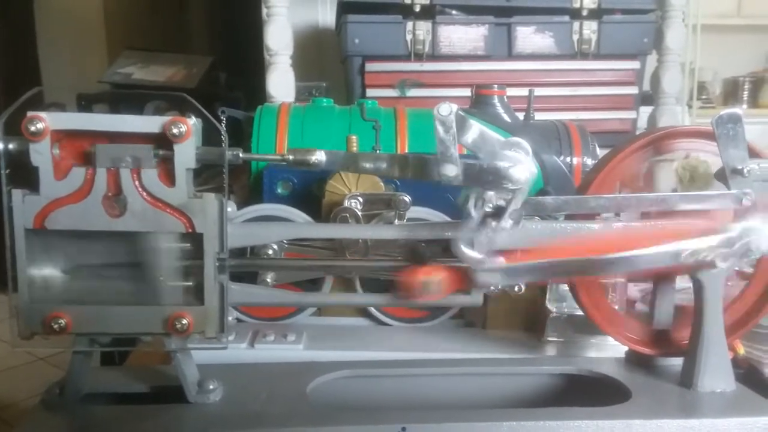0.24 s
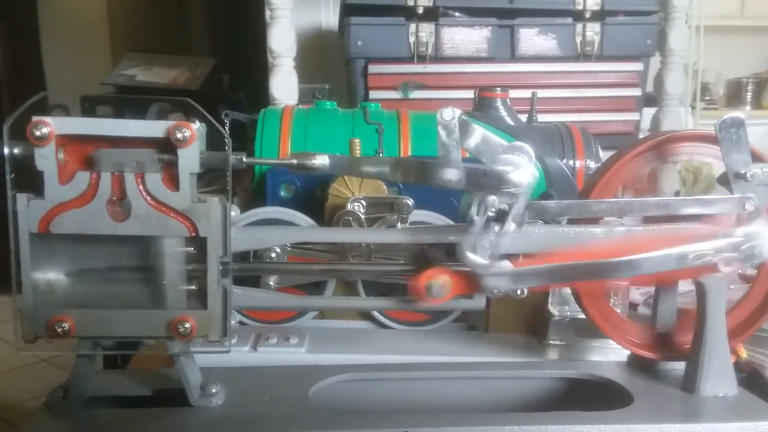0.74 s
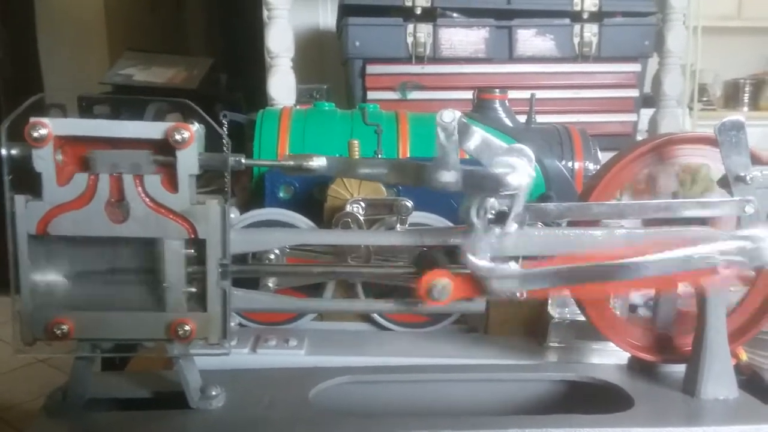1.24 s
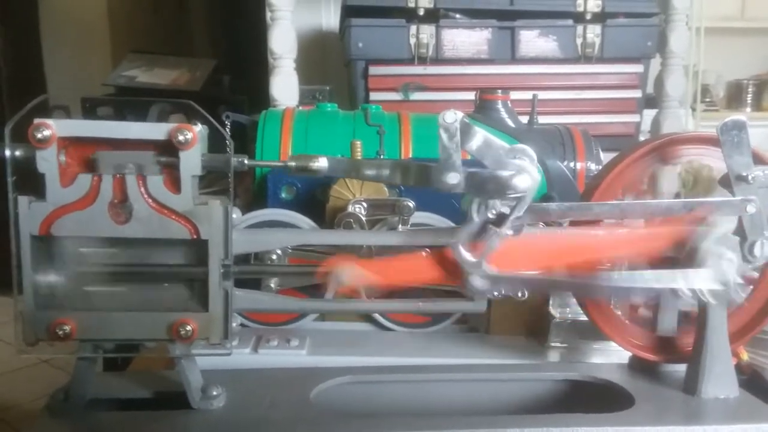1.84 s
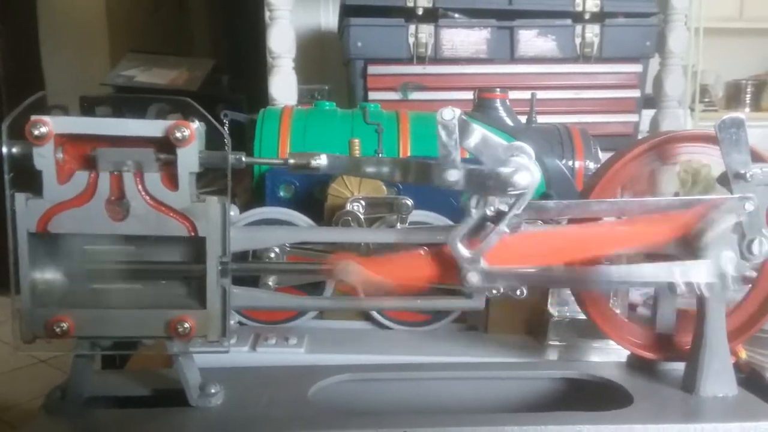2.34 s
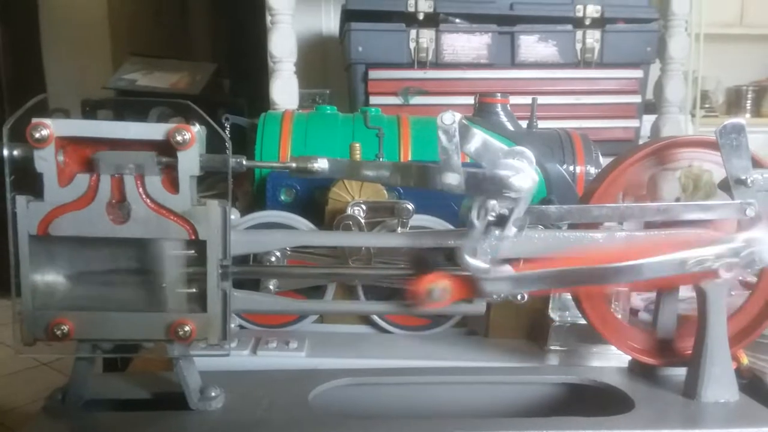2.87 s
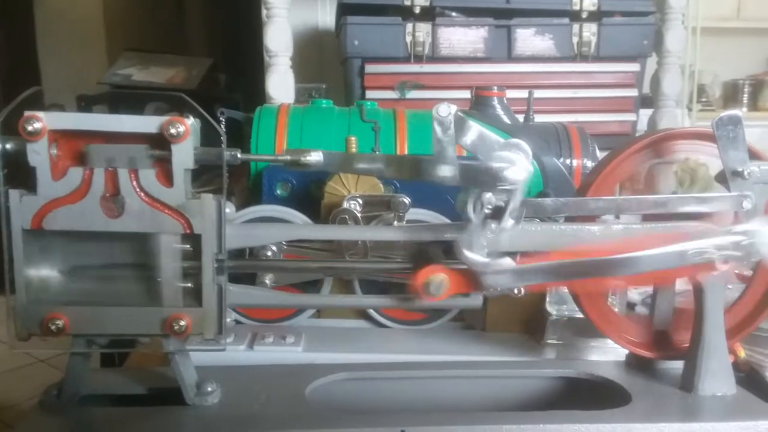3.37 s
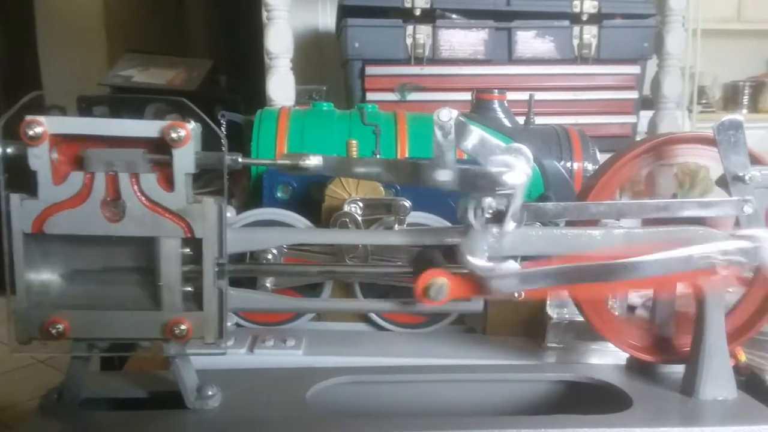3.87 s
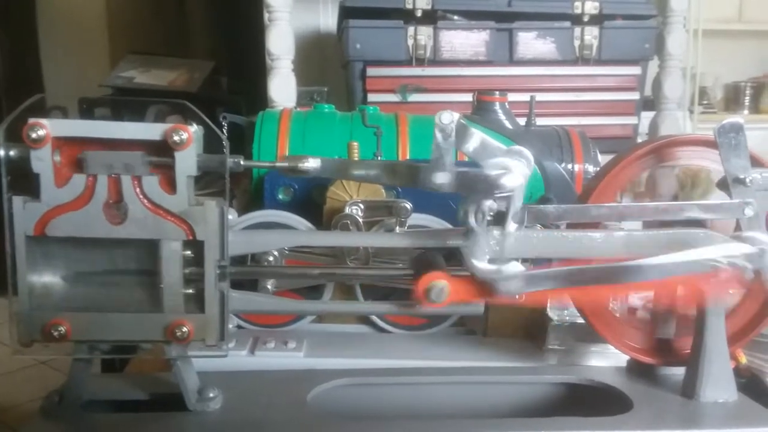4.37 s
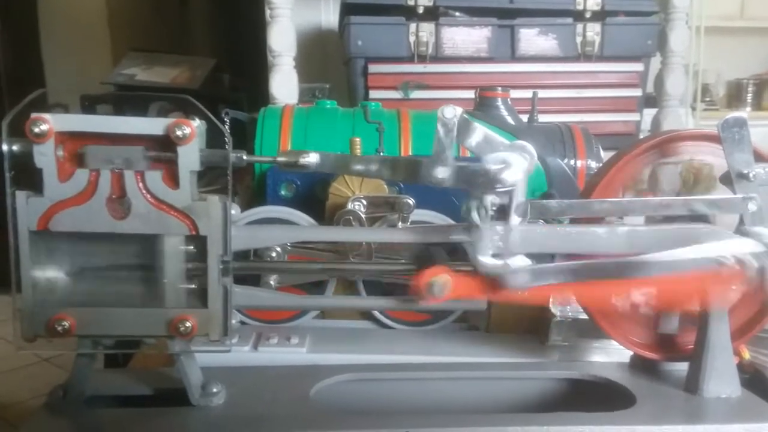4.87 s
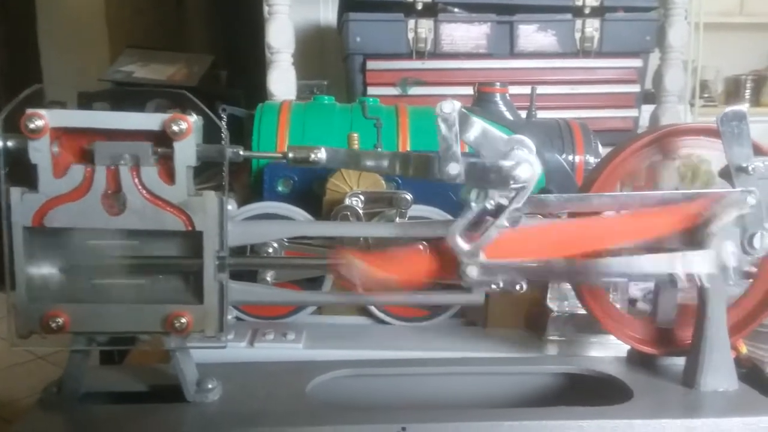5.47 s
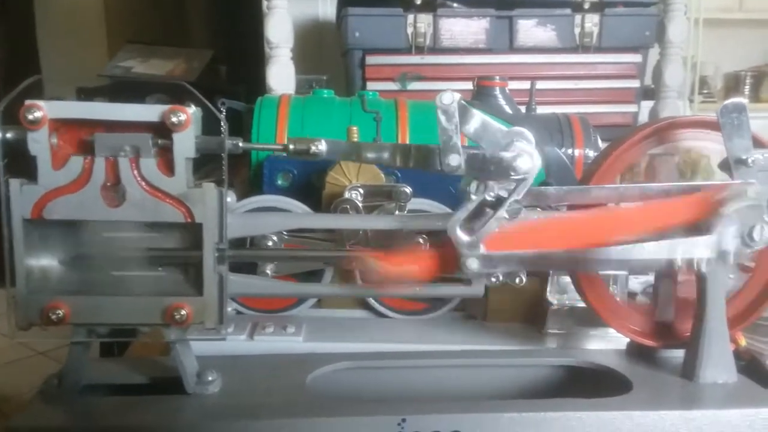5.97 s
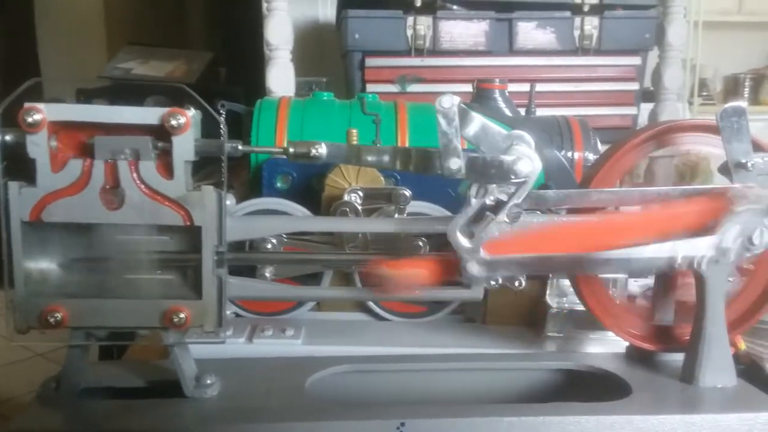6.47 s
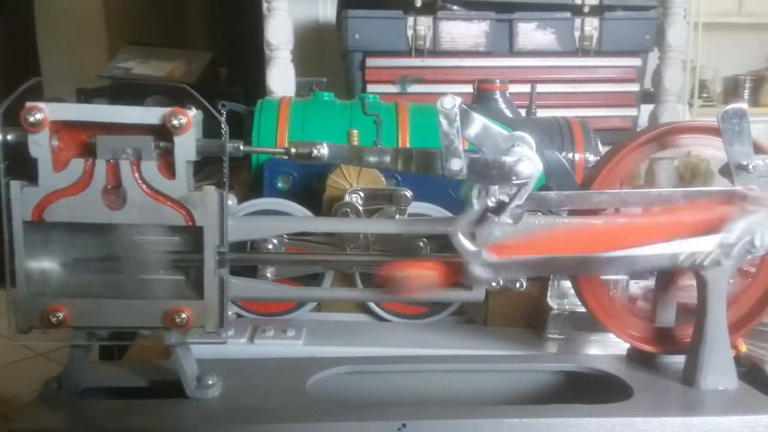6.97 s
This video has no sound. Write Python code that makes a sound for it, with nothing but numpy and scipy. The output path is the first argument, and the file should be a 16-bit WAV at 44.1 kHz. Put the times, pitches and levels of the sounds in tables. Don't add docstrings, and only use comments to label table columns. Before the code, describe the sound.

Loud, steady turbulent air from a blower spins a cutaway model engine on a bench. The roar is thick and nasal around the middle range, with little deep bass, a fine fluttering hiss, a fast buzz-like throb and a weak whine. No separate clanks stand out. Heard very close in stereo, coloured by bench and shelves, with small level steps and no start or stop.

```python
import sys
import numpy as np
from scipy import signal
from scipy.fft import rfft, irfft
from scipy.io import wavfile
from scipy.ndimage import uniform_filter1d, minimum_filter1d

SR = 44100
rng = np.random.default_rng(int(sys.argv[2]) if len(sys.argv) > 2 else 0)


def wav_record(signal):
    frames = np.transpose(np.atleast_2d(signal))
    bounded = np.clip(frames, -1, 1)
    quanta = np.round(bounded * 32767).astype(np.int16)
    wavfile.write(sys.argv[1], SR, quanta)


def invert_db(level):
    return 10 ** (np.asarray(level, dtype=float) / 20)


N = 318392
T = np.arange(N) / SR
HZ = np.maximum(np.fft.rfftfreq(N, 1 / SR), 1)


def over_hz(table, axis):
    rows = np.array(table)
    return np.interp(np.log(HZ), np.log(rows[:, 0]), rows[:, axis])


def bell(hz, width_hz):
    return 1 / (1 + (2 * (HZ - hz) / width_hz) ** 2)


def walk(rate_hz):
    hold = int(SR / rate_hz)
    levels = np.repeat(rng.standard_normal(N // hold + 1), hold)
    drift = uniform_filter1d(uniform_filter1d(levels, hold), hold)[:N]
    return drift / drift.std()


# centre in Hz, width in Hz, likeness of the ports lost (0-1).
NULLS = [(459, 67, 0.36), (597, 84, 1), (1430, 100, 0.25), (1916, 126, 0.93), (2400, 200, 0),
         (3214, 400, 1), (5970, 550, 1), (7240, 1100, 0.96), (9400, 700, .4)]


def likeness_left():
    left = np.ones(len(HZ))
    for hz, width_hz, depth in NULLS:
        left = left * (1 - np.clip(depth, 0, 1) * bell(hz, width_hz) ** 2)
    return left


# frequency in Hz, correlation (0-1), lead of the right port beyond its delay in radians.
PORTS = [(30, 0.5, -1.7), (150, 0.97, 0.8), (504, 0.99, .5), (606, 0.94, 2), (1183, 0.95, 1.24),
         (1650, 0.7, 2), (2050, 0.72, 1.05), (2700, 0.85, 0.9), (4260, 0.49, -0.2), (6630, 0.84, 1.4),
         (8170, 0.56, -1.46), (9800, 0.55, 0.5), (13400, 0.4, -1), (15600, 0.4, -1.5)]
PORT_LAG_S = 22 / SR


def turbulence(drive_db, share):
    eddies = rng.standard_normal((2, N)) * invert_db(drive_db)
    common, scattered = rfft(eddies, axis=1)
    like = np.clip(over_hz(PORTS, axis=1) * likeness_left(), 0, 1)
    turn = np.exp(1j * (over_hz(PORTS, axis=2) - 2 * np.pi * HZ * PORT_LAG_S))
    right = (like * common + np.sqrt(1 - like ** 2) * scattered) * turn
    return share * np.array([common, right])


# centre in Hz, width in Hz, left level in dB, right level in dB.
PATHS = [(198, 91, 4, 3.5), (428, 52, -3.5, -0.9), (504, 120, 0.5, 4), (550, 30, -4, 2.5),
         (595.6, 56, -6, -15.5), (687, 34, 0.5, 3.5), (763, 42, 1.5, -2.5), (825.4, 58, 6, 8.2),
         (920, 52, 2, 1.5), (1028, 220, 3.2, 8.5), (1138, 115, -8, 9), (1162, 344, 4.5, -9.5),
         (1337, 97, 9.5, 11.5), (1398, 326, -13, -5.5), (1560, 128, 12, 6), (1710, 306, -10, -2.5),
         (2090, 504, 3.5, 8.5), (2725, 220, 1.5, 6.5), (3260, 290, 5, -1.4), (3980, 770, 3.5, -3),
         (4850, 290, 3, 2), (5680, 780, 5, 4.5), (6900, 1700, 5, 0.7), (7810, 910, 4.5, 1.5),
         (9520, 490, -14.5, -5), (10470, 2300, -1.5, 4.5), (13350, 580, 1.5, 4.5), (13850, 970, 2.5, 4)]
BASS_LEAN_DB, BASS_HZ = 2, 220


def path_db():
    colour = np.outer([0.5, -0.5], BASS_LEAN_DB * bell(0, 2 * BASS_HZ))
    for hz, width_hz, left_db, right_db in PATHS:
        colour = colour + np.outer([left_db, right_db], bell(hz, width_hz))
    return colour


# left delay in seconds, right delay in seconds, level in dB.
ECHOES = [(.0023, 0.0024, -23), (.0071, 0.0087, -31), (.0133, .0133, -29.5), (0.0227, .0226, -23.5),
          (.031, .031, -20)]
ECHO_DULL_HZ = 2500


def room_echoes():
    echoes = 0
    for left_s, right_s, db in ECHOES:
        echoes = echoes + invert_db(db) * np.exp(-2j * np.pi * np.outer([left_s, right_s], HZ))
    return 1 + bell(0, 2 * ECHO_DULL_HZ) * echoes


# frequency in Hz, density in dB per Hz.
AIR = [(30, -41), (60, -29), (150, -14), (300, -12), (560, -8), (720, 1.5), (1400, -2), (3300, -19),
       (8000, -19.5), (15600, -23.5)]
ROTOR_HZ, WHEEL_HZ = 43.4, 6.17
ROAR_DB, HISS_DB, SPLIT_HZ = -16, -15, 2900


def blower():
    rotor = 2 * np.pi * np.cumsum(ROTOR_HZ * (1 + 0.0031 * walk(1.68))) / SR
    wheel = 2 * np.pi * WHEEL_HZ * T
    gusts, fast_gusts = walk(22), walk(55)
    flutter = gusts - uniform_filter1d(gusts, size=SR // 7)
    fast_flutter = fast_gusts - uniform_filter1d(fast_gusts, size=SR // 7)
    throb_db = 0.94 * np.cos(rotor) + 0.42 * np.cos(rotor / 2) + 0.33 * flutter
    chop_db = 0.15 * np.cos(wheel + 0.28) + 0.5 * flutter + 0.54 * fast_flutter

    high = 1 / (1 + (SPLIT_HZ / HZ) ** 6)
    roar = turbulence(ROAR_DB + throb_db, np.sqrt(1 - high))
    hiss = turbulence(HISS_DB + chop_db, np.sqrt(high))
    colour = invert_db(over_hz(AIR, axis=1) + path_db() + 14.5)
    return irfft((roar + hiss) * room_echoes() * colour, N, axis=1)


# pitch in Hz, level in dB, waver in Hz, left minus right in dB, lag of the right port in radians.
TONES = [(120, -54, .3, 1.5, .1), (175, -40, 1.5, 2.4, .2), (679, -34.5, 1.5, 1, .5),
         (820.5, -27, 3, 0, 1.0), (1358, -41, 3, -3, 2.6), (4706, -47, 5, 3, 2.5), (4751, -49, 3, 3, 2.7),
         (4775, -50, 3, 3, 2.9)]


def hum():
    out, speed = 0, walk(4)
    for hz, db, waver_hz, lean_db, lag in TONES:
        phase = 2 * np.pi * np.cumsum(hz + waver_hz * speed) / SR
        balance = invert_db(np.array([[lean_db], [-lean_db]]) / 2)
        ports = balance * np.sin([phase, phase - lag])
        strength = np.sqrt(2) * invert_db(db + 1.3 * walk(5))
        out = out + strength * ports
    return out


def scene():
    return blower() + hum()


# start in seconds, length in seconds.
GAIN_UP = [
    (1.203, .67),
    (2.898, .72),
    (4.5, 3),
]
GAIN_STEP_DB, GAIN_SLEW_S = 1.53, 0.04


def gain_steps():
    up = 0
    for start_s, length_s in GAIN_UP:
        rise = np.clip((T - start_s) / GAIN_SLEW_S, 0, 1)
        fall = np.clip((T - start_s - length_s) / GAIN_SLEW_S, 0, 1)
        up = up + rise - fall
    return invert_db(GAIN_STEP_DB * up)


def limiter(hot):
    need = np.minimum(1, 0.965 / (np.abs(hot).max(axis=0) + 1e-9))
    return hot * uniform_filter1d(minimum_filter1d(need, size=257), size=257)


def top_cut(x):
    return signal.sosfilt(signal.butter(12, 15800, fs=SR, output="sos"), x)


TOP_HZ = 15815


def record(dry):
    limited = limiter(dry * gain_steps())
    held = irfft(rfft(limited, axis=1) * (HZ < TOP_HZ), N, axis=1)
    return top_cut(held)


dry = scene()
out = record(dry)
wav_record(out)
```